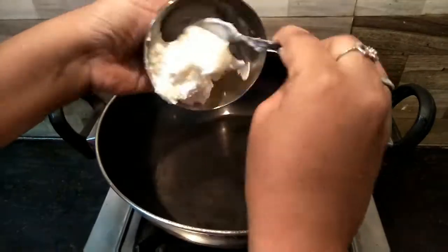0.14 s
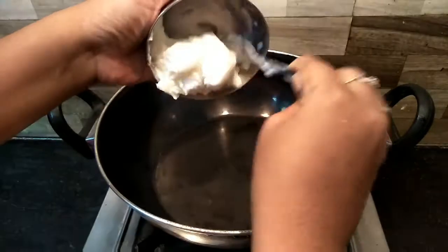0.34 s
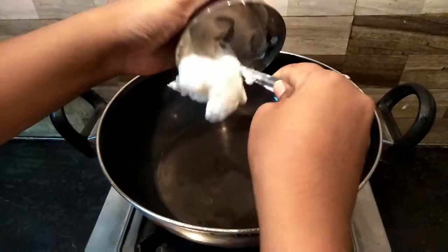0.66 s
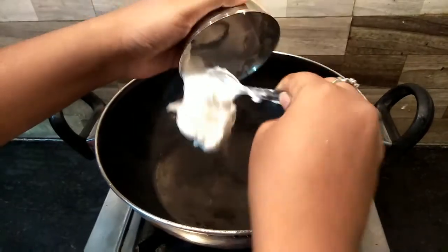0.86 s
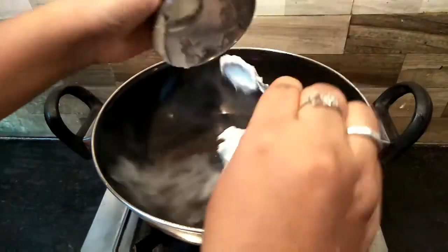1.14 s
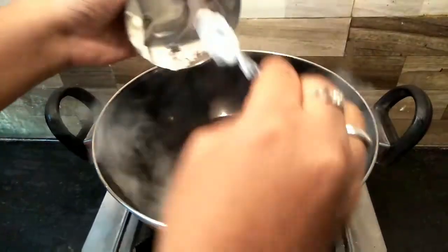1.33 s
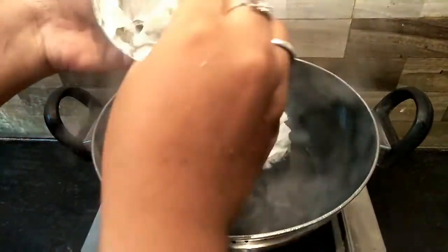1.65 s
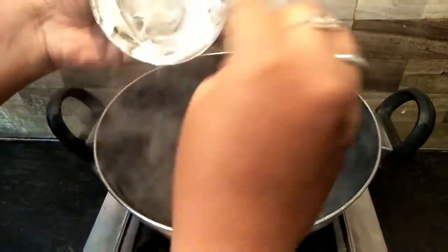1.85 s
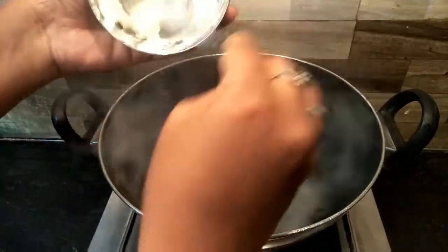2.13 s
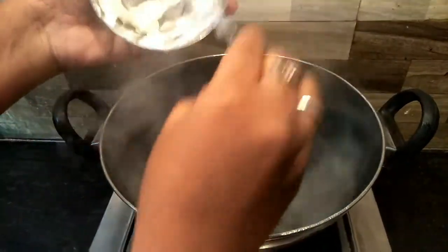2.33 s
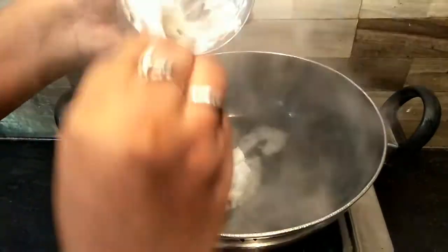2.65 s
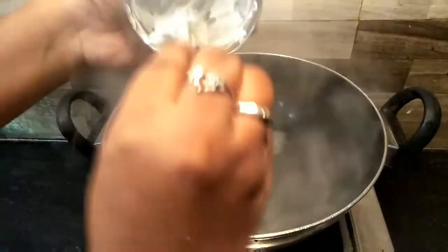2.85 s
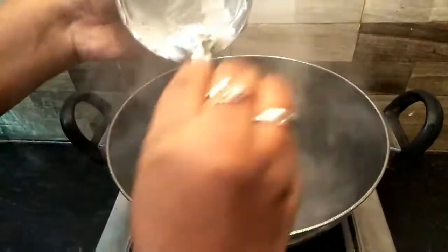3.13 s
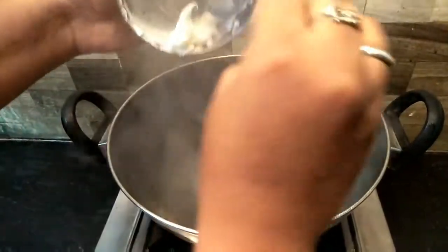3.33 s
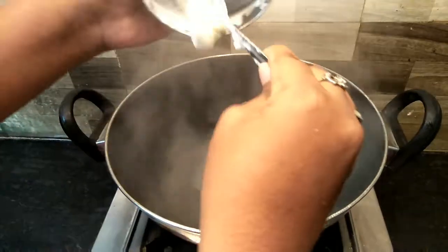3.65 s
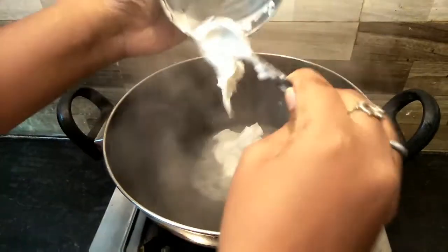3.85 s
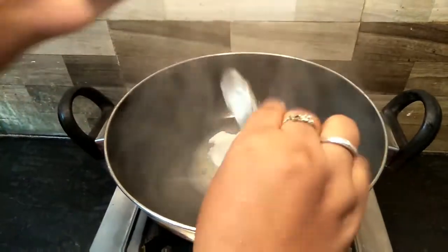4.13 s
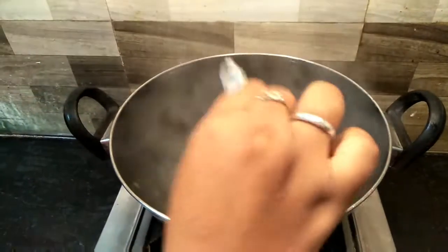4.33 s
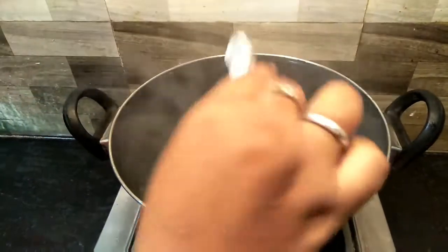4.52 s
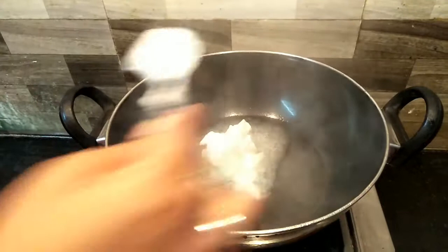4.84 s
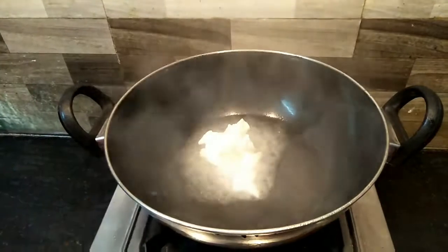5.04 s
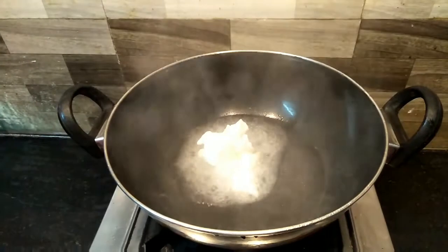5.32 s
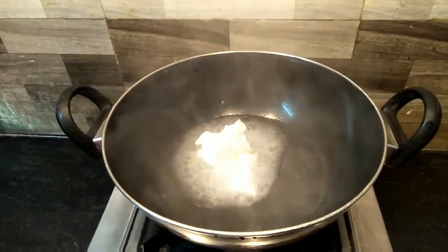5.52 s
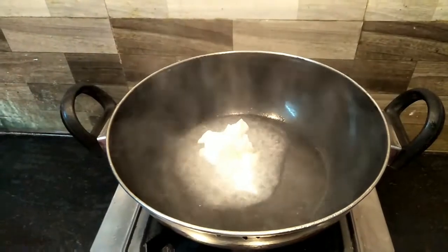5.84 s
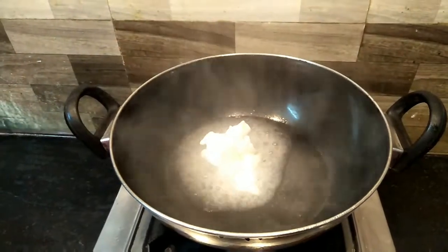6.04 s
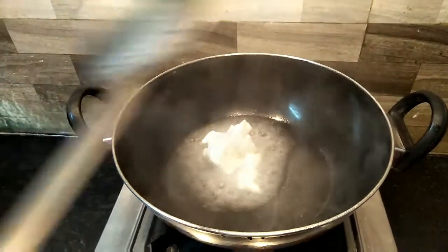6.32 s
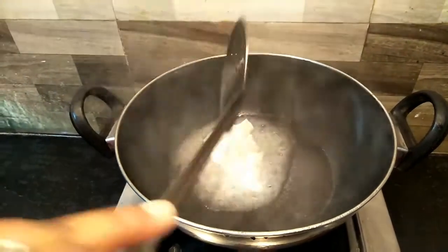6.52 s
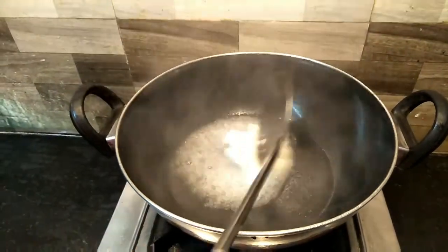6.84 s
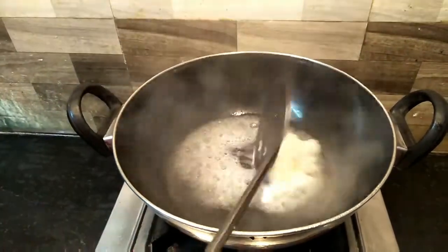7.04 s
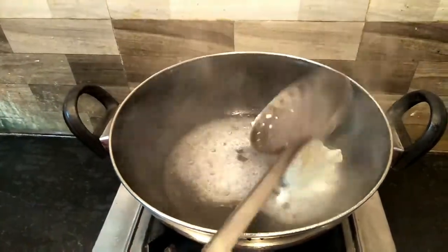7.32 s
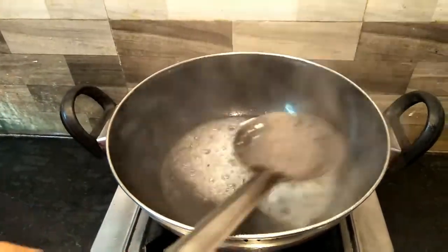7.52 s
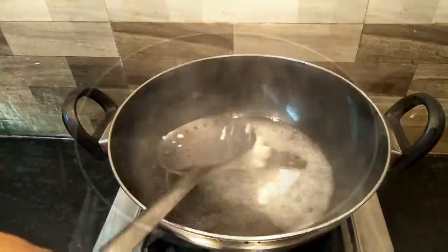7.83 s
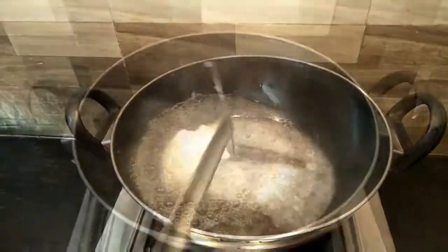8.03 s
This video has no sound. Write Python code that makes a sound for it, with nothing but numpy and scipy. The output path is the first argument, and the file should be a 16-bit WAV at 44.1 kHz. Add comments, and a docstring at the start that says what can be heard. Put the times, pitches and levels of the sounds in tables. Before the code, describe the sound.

A spoon grates and clinks lightly in a small steel bowl, then butter meets hot metal and sizzles sharply. Louder clinks and short squeaks follow over the hiss. Once the spoon stops, crackling and spits stand out; a ladle is picked up with a bright metallic shing, slides along the rim and knocks the pan hard. Close microphone in a small hard-surfaced kitchen.

```python
"""Butter sizzles and spits in a hot steel pan: random grains make the hiss, short noise bursts the spits.
A spoon clinks and squeaks in a hand-held steel bowl, by decaying modes and gliding tones.
A ladle is picked up and slides over the rim, by shaped friction noise; ladle and dollops knock the pan.
A small hard kitchen answers with a short noise tail, over still air, a low hum and the burner's drone."""
import sys
import numpy as np
from scipy import signal
from scipy.fft import rfft, irfft, next_fast_len
from scipy.io import wavfile

SR = 44100
rng = np.random.default_rng(int(sys.argv[2]) if len(sys.argv) > 2 else 0)


def wrap_up_sound(samples):
    """Save the sound to the file named by the first command line argument, as 16-bit audio."""
    columns = np.atleast_2d(samples).T
    # keep every value between -1 and 1, then stretch to whole-number steps
    tamed = np.clip(columns, -1, 1)
    steps = np.round(tamed * 32767).astype(np.int16)
    wavfile.write(sys.argv[1], SR, steps)


N = 360297

LIFT_S, LIFT_ATTACK_S, LIFT_HOLD_S = 5.654, 0.012, 0.024  # the ladle is picked up


def amp(db):
    """Decibels to a linear gain."""
    return 10 ** (np.asarray(db) / 20)


def unit(x):
    """x scaled to rms 1."""
    return x / np.sqrt(np.mean(x ** 2) + 1e-20)


def along(points, hz):
    """(Hz, value) points read at hz, on a log frequency axis."""
    f, v = np.transpose(points)
    return np.interp(np.log(hz + 1), np.log(f + 1), v)


def gains(rows):
    """Each dB column of timed rows as a gain per sample."""
    s, *columns = np.transpose(rows)
    return [amp(np.interp(np.arange(N) / SR, s, column)) for column in columns]


def wobble(rate):
    """A random curve through normally distributed knots, rate knots a second."""
    knots = rng.standard_normal(int(N * rate / SR) + 2)
    return np.interp(np.arange(N) * rate / SR, np.arange(len(knots)), knots)


def filtered(x, response):
    """x times a response of frequency, padded against wrap-around."""
    m = next_fast_len(len(x) + SR // 4)
    return irfft(rfft(x, m) * response(np.fft.rfftfreq(m, 1 / SR)), m)[:len(x)]


def coloured(x, spectrum):
    """x shaped by (Hz, dB) points, at rms 1."""
    return unit(filtered(x, lambda hz: amp(along(spectrum, hz))))


def resonances(x, peaks):
    """x through parallel (Hz, width Hz, dB) resonances, at rms 1."""
    def response(f):
        return sum(amp(db) * 1j * f * w / (c * c - f * f + 1j * f * w) for c, w, db in peaks)
    return unit(filtered(x, response))


def add(track, s, sound):
    """Mix a sound in at time s."""
    start = max(round(s * SR), 0)
    track[start:start + len(sound)] += sound[:N - start]


def grains(rate, spread_db):
    """Single-sample impulses at random times, of either sign and clipped log-normal size."""
    happens = rng.random(N) < rate / SR
    sign = rng.choice([-1, 1], N)
    return happens * sign * amp(spread_db * np.clip(rng.standard_normal(N), -2.5, 2.5))


def ring(modes, pitch=1, tilt_db=0, damp=1, vary_db=0):
    """Half a second of struck steel: decaying sine modes, scaled to an initial rms of 1."""
    hz, db, t60 = np.transpose(modes)[:, :, None]
    t = np.arange(SR // 2) / SR
    tilt = tilt_db * np.log2(hz / hz.mean())
    size = amp(db + tilt + vary_db * rng.standard_normal(hz.shape))
    sign = rng.choice([-1, 1], hz.shape)
    waves = sign * np.sin(2 * np.pi * hz * pitch * t) * amp(-60 * t / (t60 * damp))
    onset = 1 - np.exp(-t / 0.00031)
    return (size * waves).sum(0) * onset / np.sqrt(np.sum(size ** 2) / 2)


def crack(t60):
    """The brief contact noise of a blow, dying by 60 dB in t60 seconds."""
    t = np.arange(SR // 5) / SR
    contact = [(100, -20), (400, -15), (800, -11), (1050, -9), (1600, 0.5), (2900, 1),
               (4000, -13), (7000, -23.5), (15000, -30)]  # (Hz, dB)
    return coloured(rng.standard_normal(len(t)), contact) * amp(-60 * t / t60)


def stroke(start, attack, hold, t60):
    """A gain that rises, holds and dies away; all times in seconds."""
    t = np.arange(N) / SR - start
    return np.clip(t / attack, 0, 1) * amp(-60 * np.maximum(t - attack - hold, 0) / t60)


def rasp():
    """Rough friction of steel on steel: a stream of grains in the colour of the rub."""
    # Spectrum of the rub. Each row: frequency in Hz, relative level in dB per Hz.
    rub_colour = [(35, -49), (60, -24), (353, -19.5), (919, -12.5), (1300, -16), (4180, -3.5), (4810, 2.5),
                  (7150, -15.5), (13100, -17), (15800, -27)]
    return coloured(grains(rate=5400, spread_db=2), rub_colour)


def registers(x, low_hz=1500, high_hz=6500):
    """Bursts in the colour of the pan, split into middle, high and low, each at rms 1."""
    # Spectrum of the sizzling pan. Each row: frequency in Hz, relative level in dB per Hz.
    pan_colour = [(200, -33), (480, -18.5), (580, -11), (850, -3.5), (1010, -11.5), (1300, -5),
                  (2000, -6.8), (2750, -0.4), (4200, -6.5), (4950, -5), (6300, -13), (10800, -16),
                  (13000, -9), (15800, -24.5)]
    x = coloured(x, pan_colour)
    low = filtered(x, lambda hz: 1 / (1 + (hz / low_hz) ** 8))
    high = filtered(x, lambda hz: 1 - 1 / (1 + (hz / high_hz) ** 8))
    return unit(x - low - high), unit(high), unit(low)


def background():
    """Still air as shaped noise, hum as slightly unsteady sines, the burner's drone as low noise."""
    # Steady low hum. Each row: frequency in Hz, rms level in dB.
    hum_tones = [(91.5, -71), (129.2, -69)]
    # Spectrum of the still room. Each row: frequency in Hz, relative level in dB per Hz.
    air_colour = [(15, -40), (25, -24), (49, -9), (91, -14), (228, -26), (654, -37), (857, -26), (955, -34),
                  (1590, -33), (15800, -50.5)]
    # Swell of the burner's drone. Each row: time in seconds, level in dB before a 1 dB trim.
    drone_level = [(0.0, -62), (1.11, -62), (1.64, -47), (1.84, -63), (4.03, -66), (4.28, -44.5),
                   (5.12, -63), (5.82, -52), (6.01, -66), (7.26, -56), (8.01, -73), (8.17, -54)]
    t = np.arange(N) / SR
    hum = sum(amp(db) * np.sqrt(2) * np.sin(2 * np.pi * hz * t + 0.22 * wobble(3.03))
              for hz, db in hum_tones)
    air = amp(-63) * coloured(rng.standard_normal(N), air_colour)
    drone_colour = [(20, -24), (60, -11), (80, -9), (93, 7), (110, -10), (150, -18), (200, -26),
                    (500, -34), (1500, -90)]  # (Hz, dB)
    drone = coloured(rng.standard_normal(N), drone_colour)
    return hum + air + amp(-1) * gains(drone_level)[0] * drone


def squeaks():
    """The spoon's edge sticks and slips on the steel and keeps a mode singing, unsteady in grip and pitch."""
    # Each row: start in seconds, length in seconds, first Hz, last Hz, level in dB before the grip varies it.
    squeak_rows = [(.005, 0.046, 1424, 1400, -53), (.40, 0.061, 1595, 1500, -46),
                   (.56, 0.33, 1554, 1516, -56), (.62, 0.29, 2860, 2800, -60),
                   (1.725, 0.11, 1480, 1475, -34), (2.968, 0.03, 3040, 3003, -21),
                   (3.001, 0.016, 3102, 3050, -11.5), (3.025, .07, 3090, 3120, -18.5),
                   (3.041, .03, 1442, 1410, -21.5), (3.345, 0.036, 3040, 3130, -18),
                   (3.661, .11, 1705, 2180, -30), (3.694, 0.0495, 3900, 4230, -29)]
    # Overtones of a squeak. Each row: frequency ratio, level in dB before the pitch shifts it.
    overtones = [(1.648, -18), (2.254, -23), (2.75, -37), (3.505, -31), (3.99, -35), (4.76, -34)]
    out = np.zeros(N)
    grip = amp(5.9 * wobble(130))
    waver_hz = 45 * wobble(500)
    for s, length, from_hz, to_hz, db in squeak_rows:
        u = np.linspace(0, 1, int(length * SR))
        part = int(s * SR) + np.arange(len(u))
        phase = 2 * np.pi * np.cumsum(from_hz + (to_hz - from_hz) * u + waver_hz[part]) / SR
        # overtones weaken by 18 dB per octave below 3100 Hz and strengthen above it
        over_db = 18 * np.log2(to_hz / 3100)
        tone = np.sin(phase)
        tone = tone + sum(amp(level + over_db) * np.sin(ratio * phase) for ratio, level in overtones)
        swell = np.abs(np.sin(np.pi * u)) ** 0.28
        add(out, s, amp(db) * tone * grip[part] * swell)
    return out


def scoops():
    """Short grating strokes of steel on steel: friction grains excite a resonance, with a ringing rasp."""
    # Each row: start in seconds, length in seconds, gain in dB, main resonance in Hz, rasp gain re that in dB.
    scoop_rows = [(0.248, 0.059, -29.5, 2590, -19), (0.352, 0.15, -50.5, 2930, -1),
                  (.52, 0.16, -67, 3000, 1), (0.783, 0.085, -46.5, 2380, -8), (.84, .07, -56, 2500, -1),
                  (5.382, .03, -24, 2800, -16), (6.937, 0.024, -22, 2720, -24)]
    # Steel rung by the strokes. Each row: frequency in Hz, width in Hz, level in dB; applied twice.
    rung_steel = [(1910, 120, 2), (3560, 170, -2), (4320, 160, -5), (5110, 300, -0.5), (5580, 300, -2.5),
                  (6630, 290, -4), (10500, 500, -8), (12600, 1100, -7)]
    out = np.zeros(N)
    friction = grains(rate=3000, spread_db=4.5)
    ringing_rasp = amp(-10) * rasp() + resonances(resonances(friction, rung_steel), rung_steel)
    t = np.arange(SR // 5) / SR
    for s, length, db, hz, rasp_db in scoop_rows:
        part = rng.integers(N - len(t)) + np.arange(len(t))
        peak = [(hz, 650, 0)]  # (Hz, width Hz, dB)
        grate = resonances(resonances(friction[part], peak), peak) + amp(rasp_db) * ringing_rasp[part]
        add(out, s, amp(db) * grate * np.interp(t / length, [0, 0.3, 1], [0, 1, 0]))
    return out


def clinks():
    """The spoon strikes modes of the hand-damped bowl, with contact noise and a low thump."""
    # Each row: start in seconds, level in dB, pitch factor set by grip and contact point,
    # brightness in dB per octave.
    clink_rows = [(0.2513, -27.5, 0.97, 4), (.268, -35, 0.98, 6), (.304, -41, 0.99, 4),
                  (.409, -49, 1.14, -3), (.447, -43, 1.02, 0), (1.641, -8, 1, -8),
                  (2.036, -10.5, 1.02, -2.5), (2.328, -13.5, 1.18, -2), (2.442, -9.5, 1.18, 2),
                  (2.636, -7.5, 1.11, 4), (2.785, -20, 1.13, -1), (2.969, -20.5, 1.08, -7),
                  (3.002, -10.5, 1.2, -8.5), (3.345, -13.5, 1.04, 0)]
    # Modes of the bowl. Each row: Hz before the pitch factor, dB before tilt and variation,
    # t60 in seconds before damping.
    bowl_modes = [(790, -12.5, 0.028), (1297, -9.5, 0.045), (1551, 2, 0.058), (1730, -7, .045),
                  (1950, -4.5, 0.054), (2450, -12, 0.043), (2638, 0.5, 0.099), (3060, -6.5, 0.079),
                  (3380, -28, 0.03), (4500, -35, 0.042), (5400, -31, .07), (6900, -32, 0.11),
                  (11000, -40, .1), (15000, -46, .08)]
    bowl, thumps = np.zeros(N), np.zeros(N)
    t = np.arange(SR // 5) / SR
    thump_colour = [(30, -8), (90, 0), (450, -2), (900, -10), (2000, -50)]  # (Hz, dB)
    for s, db, pitch, tilt_db in clink_rows:
        damp = 0.53 * amp(-0.17 * db)  # a lighter touch rings longer
        add(bowl, s, amp(db) * ring(bowl_modes, pitch, tilt_db, damp, vary_db=1.5))
        add(bowl, s, amp(db - 1.5) * crack(t60=0.029))
        # a duller clink thumps the hand under the bowl harder
        thump = coloured(rng.standard_normal(len(t)), thump_colour) * amp(-60 * t / 0.06)
        add(thumps, s, amp(db - 36 - tilt_db) * thump)
    # a small bowl radiates little bass
    return thumps + signal.sosfilt(signal.butter(2, 550, "highpass", fs=SR, output="sos"), bowl)


def sizzle():
    """Thousands of steam bubbles a second merge to a hiss; larger ones stand out as crackle."""
    # Vigour of the boil, up with each dollop and stir. Each row: time in seconds,
    # sizzle in dB and fine fizz in dB, both before surges and mix trims.
    boil_levels = [(1.1, -33.5, -38), (1.3, -26.5, -31.5), (1.58, -31, -37.2), (1.88, -33, -40.7),
                   (2.2, -29.5, -33.5), (2.5, -25, -31.5), (2.9, -28, -35.4), (3.22, -33.5, -42),
                   (3.72, -29, -40.5), (4.42, -28, -36), (4.6, -36, -46.5), (5.46, -33.5, -41.5),
                   (5.62, -37.5, -46.8), (6.4, -34, -42.5), (6.88, -41, -47.5), (7.01, -27.5, -38),
                   (7.22, -32, -44.5), (7.62, -34.5, -46.5), (8.15, -38.5, -50)]
    land_s, flare_s = 1.056, 0.033  # the first dollop meets the hot steel; time for the boil to start
    landed = np.clip((np.arange(N) / SR - land_s) / flare_s, 0, 1)
    boil, fizz = gains(boil_levels)
    full = boil.max()
    # low bubbling changes by 1.47 dB per dB of sizzle
    bubbling = amp(-12.5) * full * (boil / full) ** 1.47

    surge = amp(1.07 * wobble(16) + 0.63 * wobble(70))
    layers = zip((boil, fizz, bubbling), registers(grains(rate=9000, spread_db=1)))
    hiss = sum(level * amp(0.66 * wobble(9)) * layer for level, layer in layers)

    # each larger bubble throws a few milliseconds of spray
    t = np.arange(SR // 25) / SR
    bursts = signal.fftconvolve(grains(rate=70, spread_db=4.5) ** 2, amp(-60 * t / 0.02) ** 2)[:N]
    middle, high, low = registers(np.sqrt(np.abs(bursts)) * rng.standard_normal(N))
    # the crackle thins out less than the hiss does as the boil settles
    vigour = full * (boil / full) ** 0.73
    crackle = vigour * (amp(-11) * middle + amp(-16) * high + amp(-25.5) * low)

    # steam escaping from under the dollop flutters in the bass
    flutter_colour = [(25, 0), (130, -1), (280, 1.5), (420, 0.5), (700, -30), (2000, -80)]  # (Hz, dB)
    flutter = bubbling * coloured(rng.standard_normal(N), flutter_colour)
    return landed * (amp(-1) * surge * hiss + crackle + amp(-12) * flutter + cover(boil))


def cover(boil):
    """Air trapped between pan and bowl rings with the sizzle; its note sinks as the bowl comes closer."""
    # Note of the trapped air. Each row: time in seconds, frequency in Hz before a random waver.
    note_path = [(1.1, 679), (2.0, 620), (3.3, 570.4)]
    t = np.arange(N) / SR
    s, hz = np.transpose(note_path)
    pitch_hz = np.interp(t, s, hz) + 20 * wobble(100)
    note = wobble(140) * np.sin(2 * np.pi * np.cumsum(pitch_hz) / SR)
    # the bowl starts to lift away at 3.28 s and the note falls by 30 dB a second
    lifting = amp(-30 * np.maximum(t - 3.28, 0))
    return amp(-20.5) * boil * unit(note) * lifting


def knocks():
    """Ladle and soft dollops knock the pan: its modes ring under a burst of contact noise."""
    # Each row: start in seconds, level in dB, brightness in dB per octave.
    knock_rows = [(1.295, -33.5, -4.5), (4.176, -34, -9), (7.0705, -4, -1), (8.088, -41.5, -10)]
    # Modes of the pan. Each row: frequency in Hz, level in dB before tilt and variation, t60 in seconds.
    pan_modes = [(271, -30, 1), (330, -26.5, 0.57), (394, -19, 0.75), (428, -14.5, 0.3), (454, -10.5, 0.52),
                 (492, -11, .2), (590, -13, .12), (737, -9, 0.17), (790, 7.5, 0.032), (895, 4.5, 0.024),
                 (1270, -17, 0.3), (1670, -16, .25), (1940, -10.5, .25), (2700, -18, .25), (3456, -16, .2),
                 (4020, -14, .2)]
    out = np.zeros(N)
    for s, db, tilt_db in knock_rows:
        add(out, s, amp(db) * ring(pan_modes, tilt_db=tilt_db, vary_db=1))
        add(out, s, amp(db - 12 + tilt_db) * crack(t60=0.27))
    return out


def spits():
    """A water pocket cracks open in the fat, and its spray dies away on the hot steel."""
    # Each row: start in seconds, level in dB, low thud and spray in dB re level; all before the trims below.
    spit_rows = [(3.1477, -20, -11.5, -18), (3.4587, -16, -16, -12), (3.5092, -18.5, -13.5, -7.5),
                 (3.6262, -19, -19, -6.5), (3.7526, -19, -14, -5.5), (4.0394, -13, -17, -8.5),
                 (4.0882, -10.5, -15.5, -10), (4.295, -14.5, -12.5, -3), (4.348, -19, -8.5, -2.5),
                 (4.3948, -17.5, -14, -2.5), (4.456, -13.5, -4, -0.5), (4.4696, -12.5, -7, -4),
                 (4.5102, -15, -11.5, -9), (4.7246, -10, -12, -13.5), (4.836, -16.5, -9, -5.5),
                 (5.1178, -20, -23, -16), (5.1873, -13, -10, -14), (5.202, -18.5, -12, -14),
                 (5.3692, -21, -26, -11), (5.5234, -9.5, -12.5, -18), (5.991, -23.5, -18, -1),
                 (6.1541, -20.5, -26, -4), (6.251, -10, -17.5, -21), (6.275, -16, -16, -22),
                 (6.538, -13.5, -10, -2), (6.5793, -21.5, -11, -10), (6.999, -11.5, -16, -13),
                 (7.025, -18, -18, -14), (7.2714, -22.5, -9, -10), (7.5872, -21.5, -19, -12),
                 (7.6647, -16, -11.5, -6.5)]
    out = np.zeros(N)
    t = np.arange(SR // 5) / SR
    middle, high, low = registers(rng.standard_normal(N), low_hz=1950)
    opening = 1 - np.exp(-t / 0.0005)
    decay = amp(-60 * t / 0.058) + 0.25 * amp(-60 * t / 0.012) + 0.11 * amp(-60 * t / 0.34)
    for s, db, thud_db, spray_db in spit_rows:
        part = rng.integers(N - len(t)) + np.arange(len(t))
        burst = middle[part] + amp(spray_db + 1.2) * high[part] + amp(thud_db + 4) * low[part]
        add(out, s, amp(db - 5.5) * opening * decay * burst)
    return out


def lift():
    """The ladle is drawn out from other steel: dense grains ring bright resonances over a rasp."""
    # Bright ring of the steel. Each row: frequency in Hz, width in Hz, relative level in dB.
    bright_ring = [(3970, 58, 3.5), (4440, 130, 0), (4800, 110, -9), (6150, 110, -1), (6460, 23, -14),
                   (7550, 31, -16), (7960, 99, -13), (8320, 44, -16), (9400, 66, -7.5), (10900, 27, -19),
                   (12800, 110, -9), (13600, 98, -13)]
    shing = amp(-4) * resonances(grains(rate=4800, spread_db=0), bright_ring) + amp(-3) * rasp()
    return amp(-13.8) * stroke(LIFT_S, LIFT_ATTACK_S, LIFT_HOLD_S, t60=0.26) * shing


def bump():
    """Picking up the ladle jolts the counter: a dull burst of low noise."""
    thud_colour = [(20, -3), (50, 0), (90, -3), (160, -13), (350, -13), (900, -40), (3000, -80)]  # (Hz, dB)
    thud = coloured(rng.standard_normal(N), thud_colour)
    return amp(-45) * stroke(LIFT_S, LIFT_ATTACK_S, LIFT_HOLD_S, t60=0.35) * thud


def slide():
    """The ladle's handle grits along the rim and excites the modes of the ladle."""
    # Modes of the ladle. Each row: frequency in Hz, relative level in dB, t60 in seconds.
    ladle_modes = [(145, -16.5, .4), (236, -12.5, .65), (253, -12, 0.62), (269.3, -11.5, 0.72),
                   (305, -17, .3), (890, -2, 0.098), (1341, -1, 0.14), (1491, -12, .22), (1860, -15, 0.085),
                   (2200, -11, .1), (2665, -3, 0.063), (2750, 1, 0.045), (2865, -3, 0.055), (3440, -9, .1),
                   (4070, -12, 0.094)]
    grit_colour = [(50, -26), (140, -6.5), (600, -13), (1400, -4), (3000, 0), (6000, -17),
                   (15000, -28)]  # (Hz, dB)
    grit = coloured(grains(rate=3000, spread_db=4.5), grit_colour)
    rub = amp(-21) * stroke(start=6.444, attack=0.03, hold=0.04, t60=0.13) * grit
    # the ladle rings on after its handle has left the rim
    body = ring(ladle_modes)
    return rub + amp(-7) * signal.fftconvolve(rub, body / np.linalg.norm(body))[:N]


def kitchen(x):
    """Tiles and counter answer with a short dense noise tail whose treble dies sooner."""
    # Decay of the room. Each row: frequency in Hz, t60 in seconds.
    room_decay = [(200, 0.43), (2500, 0.35), (6000, 0.31), (14000, 0.21)]
    hz, t, z = signal.stft(rng.standard_normal(SR // 2), SR, nperseg=256)
    fading = z * amp(-60 * t / along(room_decay, hz)[:, None])
    tail = signal.istft(fading, SR, nperseg=256)[1]
    delayed = np.pad(tail, (SR // 300, 0))  # the answer starts 1/300 s late
    return signal.fftconvolve(x, delayed / np.linalg.norm(tail))[:N]


def scene():
    """Direct butter and steel, their answer from the kitchen, and the background."""
    butter = sizzle() + spits()
    steel = squeaks() + scoops() + clinks() + knocks() + lift() + bump() + slide()
    return butter + steel + kitchen(amp(-8) * butter + amp(-7) * steel) + background()


def record(dry):
    """A limiter rounds off the highest peaks; nothing is kept at or above 15950 Hz."""
    soft = dry / (1 + (dry / 0.75) ** 4) ** (1 / 4)
    return filtered(soft, lambda hz: hz < 15950)


dry = scene()
out = record(dry)
wrap_up_sound(out)
```